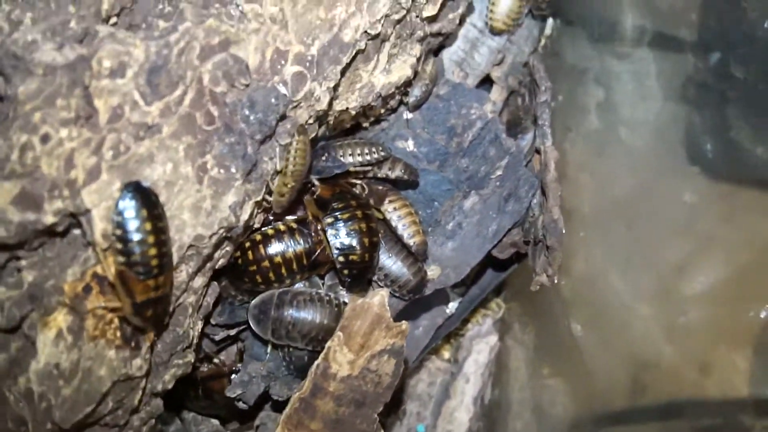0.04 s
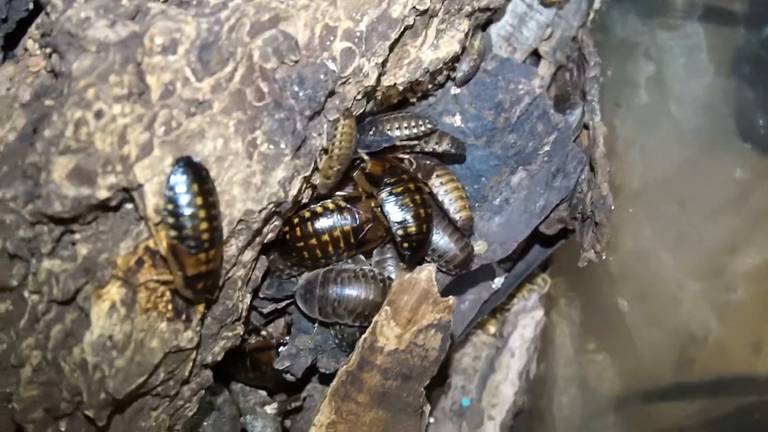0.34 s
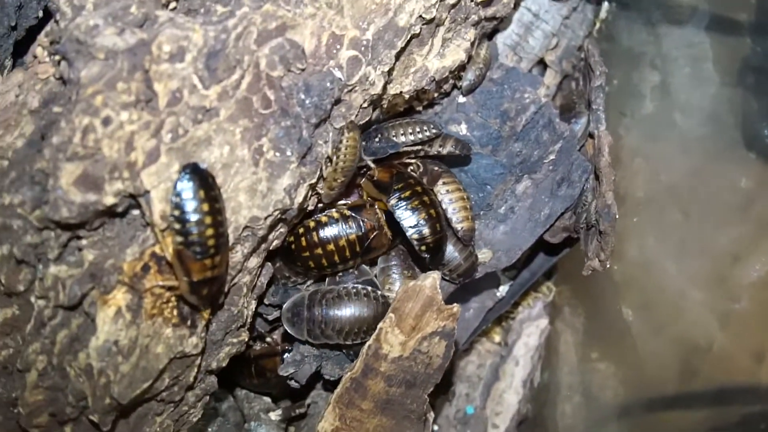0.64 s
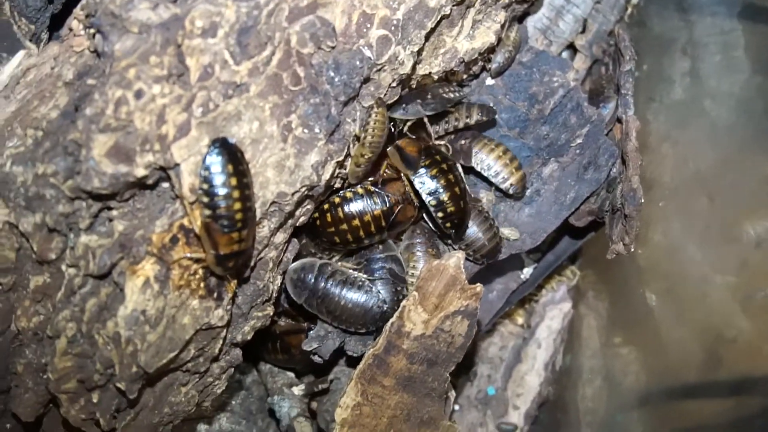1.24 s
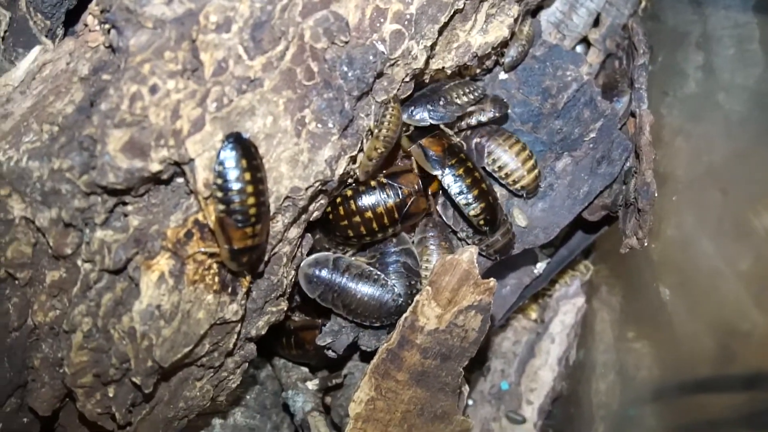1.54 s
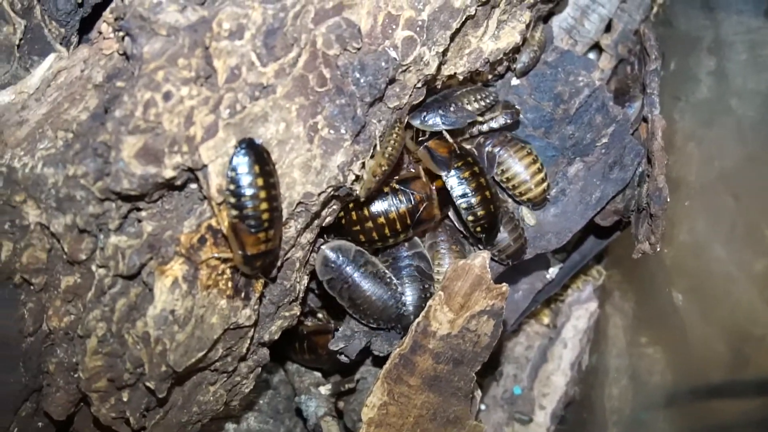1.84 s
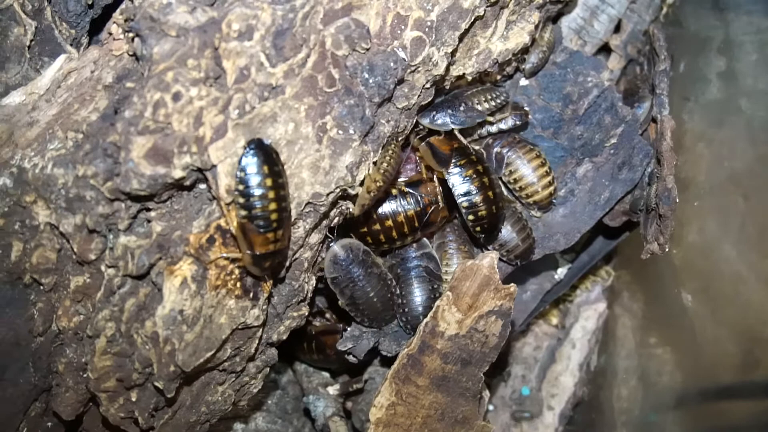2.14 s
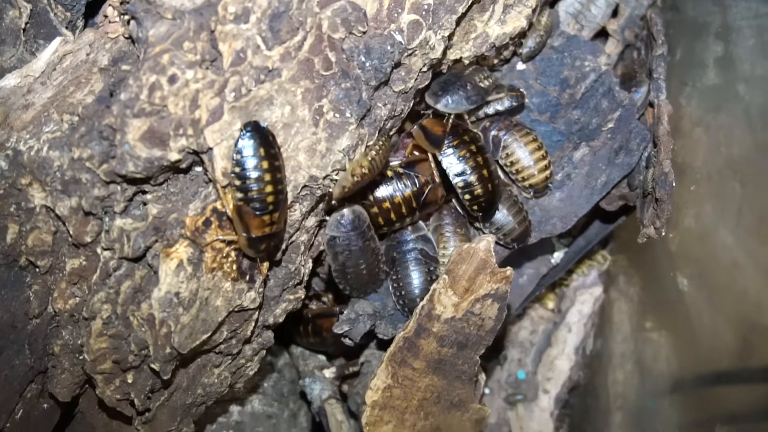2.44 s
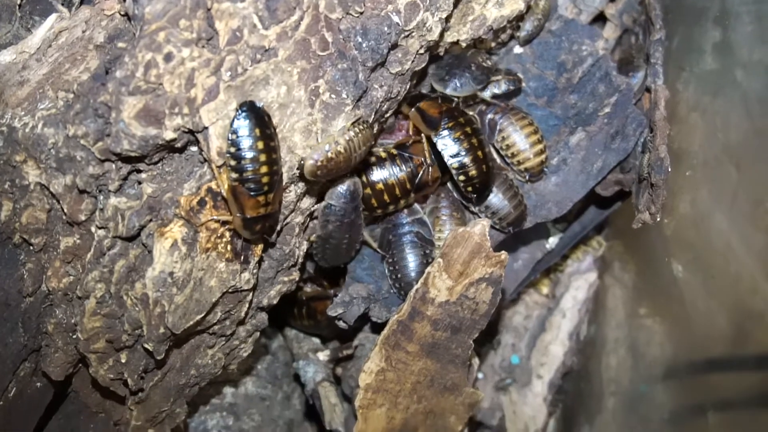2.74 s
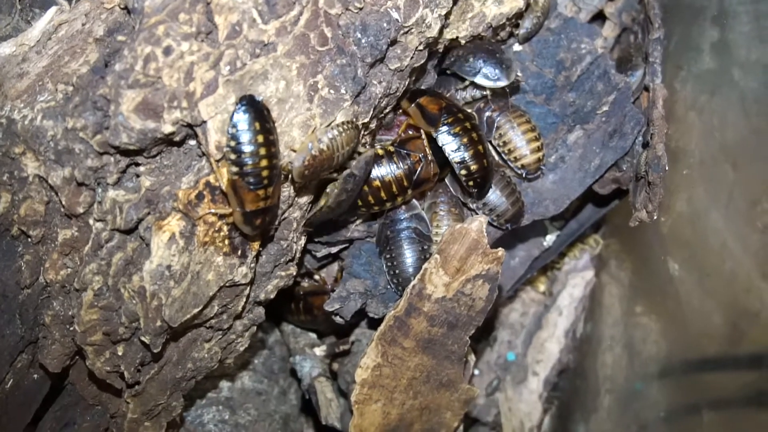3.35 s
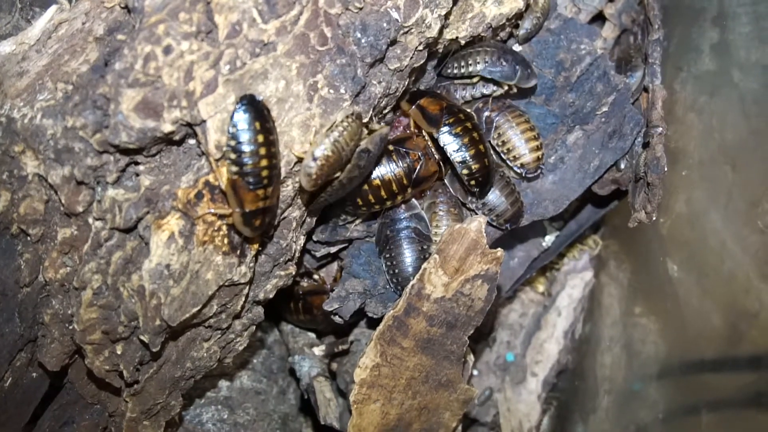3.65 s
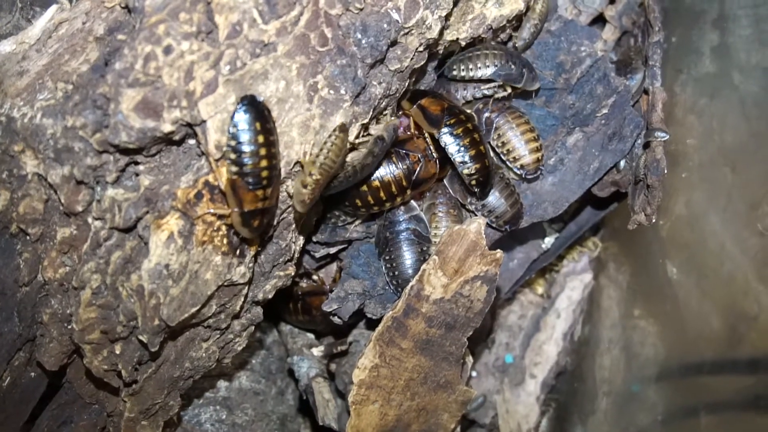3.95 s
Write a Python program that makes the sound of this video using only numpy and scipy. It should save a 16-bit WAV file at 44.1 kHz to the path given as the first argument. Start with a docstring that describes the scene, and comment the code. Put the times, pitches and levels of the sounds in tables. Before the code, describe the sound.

Close up in a tub, insects patter faintly across bark, then their claws tick and their shells scrape in brief, irregular bursts that thin out near the end. Behind them is a constant low hum and room rumble.

```python
"""Faint crackle over a low hum, then dry ticks and scrapes: cockroaches on bark in a tub, close up.
Claws snap free and skid, shells drag, legs brush thin flakes, many small feet patter.
Each contact is a train of tiny slips that rings the bark and echoes briefly in the tub.
Behind them a motor and the mains hum beat against each other over room rumble."""
import sys
import numpy as np
from scipy import signal
from scipy.fft import rfft, irfft
from scipy.io import wavfile
from scipy.ndimage import uniform_filter1d

SR = 44100
rng = np.random.default_rng(int(sys.argv[2]) if len(sys.argv) > 2 else 0)


def bounce(signal):
    """Save signal as a 16-bit WAV file at the path given by the first command-line argument."""
    frames = np.transpose(np.atleast_2d(signal))
    limited = np.clip(frames, -1, 1)
    pcm = np.round(limited * 32767).astype(np.int16)
    wavfile.write(sys.argv[1], SR, pcm)


N = 176400

# Room rumble and hiss: f/Hz, relative density/dB
ROOM_SPECTRUM = [(20, -33), (40, -25), (70, -7.5), (110, 1.5), (150, -4.5), (215, -4), (265, -5.5),
                 (300, -15), (390, -16), (450, -23.5), (510, -17.5), (580, -24), (1000, -21.5),
                 (1250, -32.5), (1800, -35.5), (3500, -39.5), (7200, -45), (9500, -42.5)]
# Room stereo image: f/Hz, left-right correlation
ROOM_CORRELATION = [(60, 0.9), (200, 0.99), (400, 0.75), (700, 0.69), (1400, 0.33), (4000, .15),
                    (10000, 0.16)]
# Motor and mains tones: f/Hz, rms level/dB, rms phase wander/rad
HUM_TONES = [(48.05, -48.7, .1), (59.11, -38.5, .06), (105.48, -32, .12), (120.03, -34.2, .06),
             (210.96, -50, .45), (240.1, -45.5, .35), (360.1, -62, .4)]
# Bark resonances: f/Hz, t60/s, relative gain/dB
BARK_MODES = [(2570, 0.018, -7), (3000, 0.022, -3), (3370, 0.016, -2), (3780, 0.019, -1.5),
              (4730, 0.026, -4), (8500, 0.036, -9), (9400, 0.017, -9)]
# Footfall spectra, firm bark and thin flakes, each: f/Hz, gain/dB
STEP_SPECTRA = [
    [(600, -23), (1500, -5.5), (3000, -2.5), (5000, -5.5), (7000, -5), (11000, -36)],
    [(600, -30), (1500, -12), (3000, -11), (6500, -9), (9500, 2), (11000, 0.5)],
]
# Footfall envelope: t/s, level/dB
STEP_ENVELOPE = [(0, -54.5), (.3, -56.5), (.43, -59.5), (.75, -58.5), (1.1, -51.5), (1.65, -57),
                 (2.5, -57.5), (3.3, -56), (4, -65.5)]
# Leg strokes: t/s, length/s, level/dB
BRUSHES = [(0.08, 0.051, -49.5), (0.159, 0.041, -49.5), (0.269, 0.068, -52), (0.928, 0.045, -51),
           (1.558, 0.058, -54.5), (1.688, 0.046, -57), (2.027, .03, -56), (2.435, 0.064, -52),
           (3.29, 0.045, -59.5), (3.393, 0.019, -51), (3.424, 0.029, -55.5), (3.505, 0.034, -56),
           (3.706, .06, -49.5)]
# Brushing leg: f/Hz, gain/dB
BRUSH_SPECTRUM = [(1000, -26), (3000, -18), (6500, -8), (9000, -1)]
# Shell drags: t/s, rise/s, fall/s, level/dB, tilt/(dB/octave)
SCRAPES = [(0.785, 0.0091, 0.022, -41.5, 7), (.803, 0.01, 0.021, -36.5, 0.5),
           (0.812, 0.017, 0.011, -32, 1.5), (.997, 0.0052, 0.027, -33.5, 3), (1.021, 0.016, 0.13, -48.5, 5),
           (1.154, 0.025, 0.026, -39.5, 5.5), (1.192, 0.025, 0.02, -48, 2), (1.331, 0.016, 0.035, -38.5, 9),
           (1.519, 0.019, 0.037, -49, 3.5), (2.169, 0.022, 0.046, -41, 9), (2.225, 0.018, 0.042, -42, 5),
           (2.784, 0.016, .05, -48.5, 6.5), (0.569, 0.01, 0.078, -45.5, 7), (3.09, 0.03, 0.04, -56.5, -3)]
# Dragging shell: f/Hz, gain/dB
SCRAPE_SPECTRUM = [(500, -17), (1100, -5.5), (2700, -5.5), (3450, 0.5), (4200, -6), (4800, -5), (6200, -15),
                   (7400, -14), (8600, -10), (11000, -10.5)]
# Claw ticks: t/s, relative low/dB, mid/dB, high/dB, ping f/Hz, left minus right/dB
TICKS = [(0.3024, -56, -58.5, -61, 2790, -3), (0.355, -68, -74, -53, 10800, 2),
         (0.5886, -76, -56, -48, 9500, 0), (0.7612, -57.5, -57, -62, 2370, -1),
         (0.9676, -55, -46.5, -52, 3380, -1), (0.9804, -68, -56, -46.5, 8310, 3),
         (1.0042, -45.5, -50.5, -46, 4660, -3), (1.0393, -68, -47.5, -46.5, 4640, -1),
         (1.054, -58, -72, -49.5, 9150, -2), (1.1779, -64, -48, -57, 3460, 0),
         (1.2062, -66, -50.5, -57, 3400, 0), (1.251, -66, -55, -54, 9600, 0),
         (1.4057, -70, -49, -48, 10000, 0.5), (1.451, -62, -60, -53.5, 8550, 1),
         (1.7425, -58, -49, -66, 2860, 4.5), (1.7643, -59, -51.5, -49.5, 2920, 3),
         (1.852, -58.5, -55, -54, 2650, 5), (1.9124, -73, -62, -47, 11000, 5),
         (2.0039, -50, -48.5, -46, 3460, 0.5), (2.1099, -53, -47.5, -44.5, 3020, 1),
         (2.2188, -55, -51.5, -51, 9840, -1), (2.582, -60, -59, -56, 3060, -1),
         (2.724, -55.5, -53, -52, 9360, -3), (2.8098, -56, -58, -52, 5000, -4),
         (2.8325, -56, -54.5, -49.5, 4970, 1), (2.9372, -58.5, -55, -59, 2540, -1),
         (2.9966, -70, -48, -42.5, 4760, 2), (3.8817, -78, -58.5, -57, 5220, 2)]
# Edges of a tick's low, mid and high bands: f/Hz
TICK_EDGES_HZ = [1400, 2700, 6000, 11200]


def amp(db):
    """Decibels to gain."""
    return 10 ** (np.asarray(db) / 20)


def unit(x):
    """Scale to rms 1."""
    return x / np.sqrt(np.mean(x ** 2) + 1e-20)


def lookup(points, hz):
    """Interpolate on a log-frequency axis."""
    f, value = np.transpose(points)
    return np.interp(np.log(hz + 1), np.log(f + 1), value)


def add(mix, start_s, sound):
    """Mix in a stereo sound."""
    part = mix[:, max(round(start_s * SR), 0):][:, :sound.shape[1]]
    part += sound[:, :part.shape[1]]


def colour(x, spectrum, tilt_db_oct=0):
    """Filter by a spectrum, tilted about 4 kHz."""
    hz = np.fft.rfftfreq(x.shape[-1], 1 / SR)
    octaves = np.log2((hz + 100) / 4000)
    return irfft(rfft(x) * amp(lookup(spectrum, hz) + tilt_db_oct * octaves), x.shape[-1])


def room(level_db=-39, flicker_db=1.06, frame=4096, hop=1024):
    """Air rumble, near mono in the bass, under a thin wide hiss."""
    hz = np.fft.rfftfreq(frame, 1 / SR)
    a, b, c, d, flicker = rng.standard_normal((5, N // hop + 5, len(hz)))
    correlation = lookup(ROOM_CORRELATION, hz)
    left = a + 1j * b
    right = correlation * left + np.sqrt(1 - correlation ** 2) * (c + 1j * d)
    flicker = uniform_filter1d(flicker, size=4, axis=0)  # over time
    flicker = uniform_filter1d(flicker, size=24, axis=1)  # over frequency
    spectra = np.array([left, right]) * amp(lookup(ROOM_SPECTRUM, hz) + flicker_db * unit(flicker))
    _, air = signal.istft(spectra.swapaxes(1, 2), nperseg=frame, noverlap=frame - hop)
    return amp(level_db) * unit(air[:, :N])


def hum():
    """Motor and mains tones, wandering slightly; the two strongest beat near 15 Hz."""
    out, t = np.zeros(N), np.arange(N) / SR
    drift_hz = np.geomspace(.2, 2.5, 6)
    for hz, db, wander_rad in HUM_TONES:
        drift = sum(np.sin(2 * np.pi * (f * t + rng.random())) / np.sqrt(f) for f in drift_hz)
        phase = 2 * np.pi * (hz * t + rng.random()) + wander_rad * unit(drift)
        out += amp(db) * np.sqrt(2) * np.sin(phase)
    return out


def slips(size, per_s, spread_db):
    """Random impulses from tiny slips: most weak, a few strong."""
    chance, strength, sign = rng.random((3, size))
    heights = amp(spread_db * np.minimum(-np.log(1 - strength), 4))
    return (chance < per_s / SR) * heights * np.sign(sign - .5)


def on_bark(drive, ring_db=3, scatter_s=.0012, tub_t60_s=.057, tub_db=2.5, size=3000):
    """Drive one spot of bark: click and modes, spread to stereo by near scatter and the tub's echo."""
    t = np.arange(size) / SR
    click = 1. * (t == 0)
    ring = click.copy()
    for hz, t60_s, db in BARK_MODES:
        decay_per_s = np.log(1000) / t60_s
        spot_hz = hz * (1 + .02 * rng.standard_normal())
        gain = amp(db + ring_db) * 2 * decay_per_s / SR
        ring += gain * np.exp(-decay_per_s * t) * np.cos(2 * np.pi * spot_hz * t)
    near, far = rng.standard_normal((2, 2, size))
    scatter = unit(near * np.exp(-t / scatter_s))
    echo = amp(tub_db) * unit(far * 1000 ** (-t / tub_t60_s))
    paths = click + (scatter + echo) / np.sqrt(size)
    response = signal.fftconvolve(paths, ring[None], axes=1)[:, :size]
    return signal.fftconvolve(drive[None], response, axes=1)[:, :len(drive)]


def footfalls(steps_per_s=420):
    """Many small feet patter on spots of firm bark and thin flakes."""
    spots = STEP_SPECTRA * 3
    patter = np.zeros((2, N))
    for spectrum in spots:
        steps = slips(N, steps_per_s / len(spots), spread_db=4.5)
        patter += colour(on_bark(steps), spectrum)
    level_db = np.interp(np.arange(N) / SR, *np.transpose(STEP_ENVELOPE))
    return amp(level_db) * unit(patter)


def leg_brushes(size=5000):
    """A spiny leg sweeps thin flakes: a soft, bright swell of slips."""
    out, t = np.zeros((2, N)), np.arange(size) / SR
    for start_s, length_s, db in BRUSHES:
        push = np.sin(np.pi * np.minimum(t / length_s, 1))
        friction = push * slips(size, per_s=2000, spread_db=9)
        rustle = colour(on_bark(friction), BRUSH_SPECTRUM)
        add(out, start_s, amp(db) * unit(rustle) * np.sqrt(np.mean(push ** 2)))
    return out


def shell_scrapes(size=10000):
    """A shell drags in dense slips that swell and fade; its pressure damps the bark."""
    out, t = np.zeros((2, N)), np.arange(size) / SR
    for start_s, rise_s, fall_s, db, tilt_db_oct in SCRAPES:
        ramp = np.minimum(t / rise_s, 1 - (t - rise_s) / fall_s)
        push = np.clip(ramp, 0, 1) ** .67
        friction = push * slips(size, per_s=2000, spread_db=3)
        rasp = colour(on_bark(friction, ring_db=-7.5), SCRAPE_SPECTRUM, tilt_db_oct)
        add(out, start_s, amp(db) * unit(rasp) * np.sqrt(np.mean(push ** 2)))
    return out


def claw_ticks(gain_db=-2.5, skid_s=.0027, slips_per_s=2400, ping_t60_s=.018, ping_db_oct=-1.5):
    """A claw snaps free and skids; the flake under it pings. Each spot has its own band balance."""
    size = 4096
    out, t = np.zeros((2, N)), np.arange(size) / SR
    attack = t < .008  # levels refer to this window
    filters = [signal.butter(4, edges, "band", fs=SR, output="sos")
               for edges in zip(TICK_EDGES_HZ, TICK_EDGES_HZ[1:])]
    for start_s, *bands_db, ping_hz, pan_db in TICKS:
        slipping = rng.random(size) < slips_per_s / SR
        skid = slipping * rng.standard_normal(size) * np.exp(-t / skid_s)
        snap = on_bark((t == 0) + skid, ring_db=13.5)
        bands = [signal.sosfilt(sos, snap) for sos in filters]
        tick = sum(amp(db) * band / band.mean(0)[attack].std() for db, band in zip(bands_db, bands))
        ping = np.sin(2 * np.pi * ping_hz * t) * 1000 ** (-t / ping_t60_s)
        ping_band = np.searchsorted(TICK_EDGES_HZ[1:-1], ping_hz)
        ping_db = bands_db[ping_band] + ping_db_oct * np.log2(ping_hz / TICK_EDGES_HZ[1])
        tick += amp(ping_db) * ping / ping[attack].std()
        sides_db = np.array([[pan_db], [-pan_db]]) / 2
        add(out, start_s, tick * amp(gain_db + sides_db))
    return out


def scene():
    """Cockroaches on bark in a humming room."""
    return claw_ticks() + shell_scrapes() + leg_brushes() + footfalls() + hum() + room()


def record(dry):
    """Steep low-pass on both channels."""
    cutoff_hz = 11150
    lowpass = signal.firwin(401, cutoff_hz, window=("kaiser", 8), fs=SR)
    return signal.oaconvolve(dry, lowpass[None], "same")


dry = scene()
out = record(dry)
bounce(out)
```